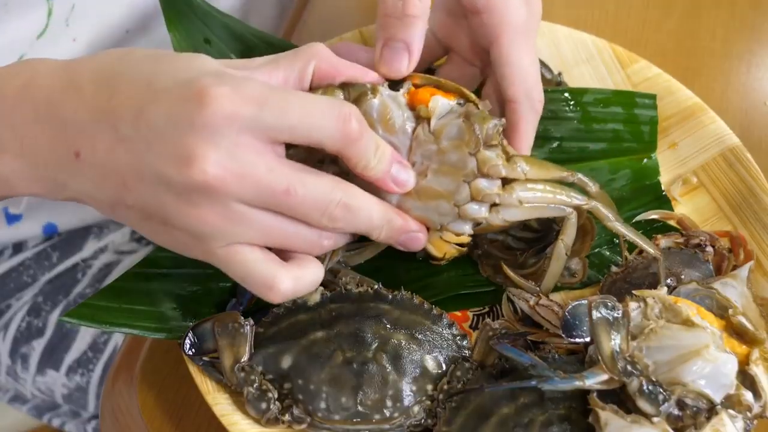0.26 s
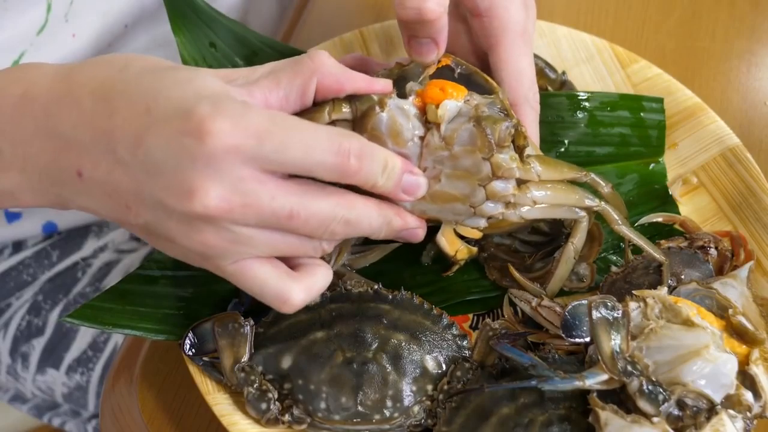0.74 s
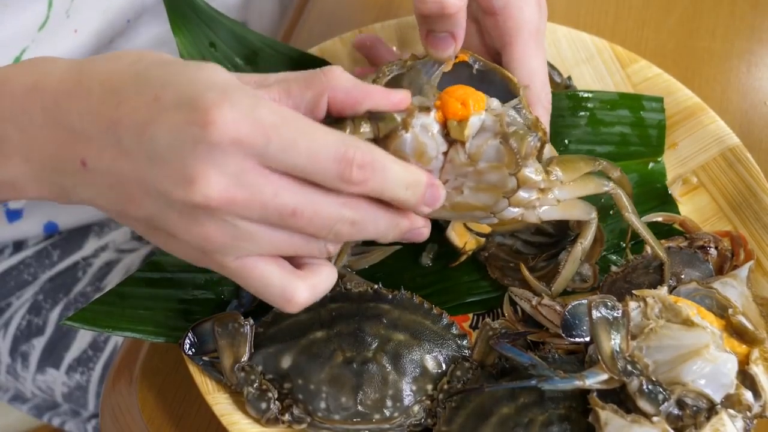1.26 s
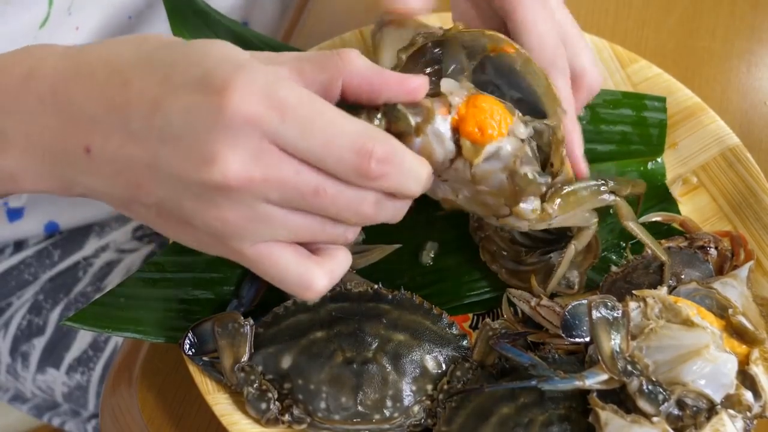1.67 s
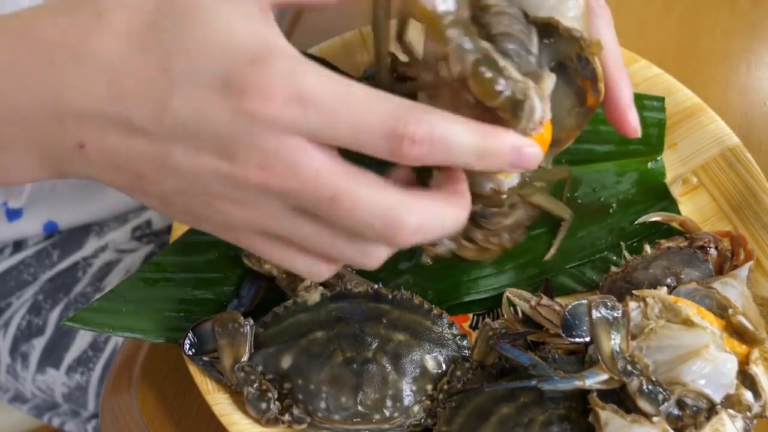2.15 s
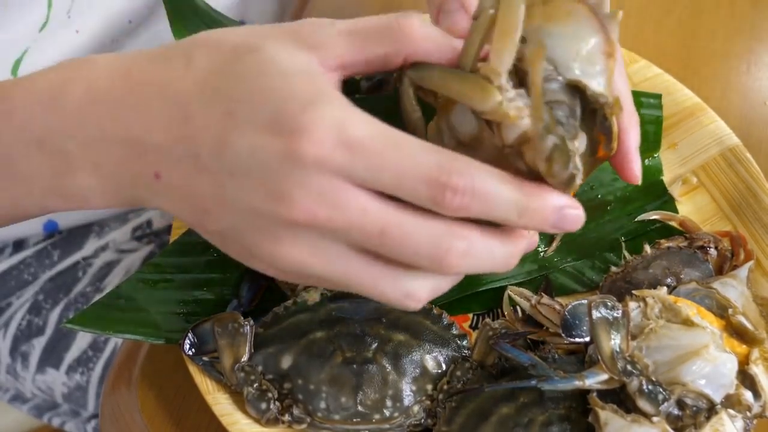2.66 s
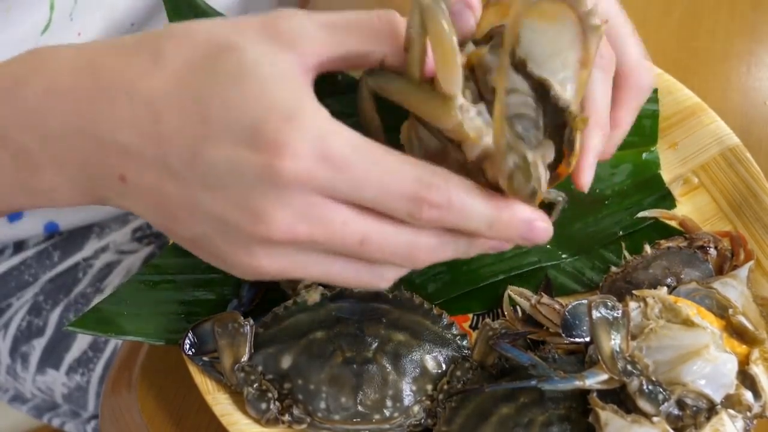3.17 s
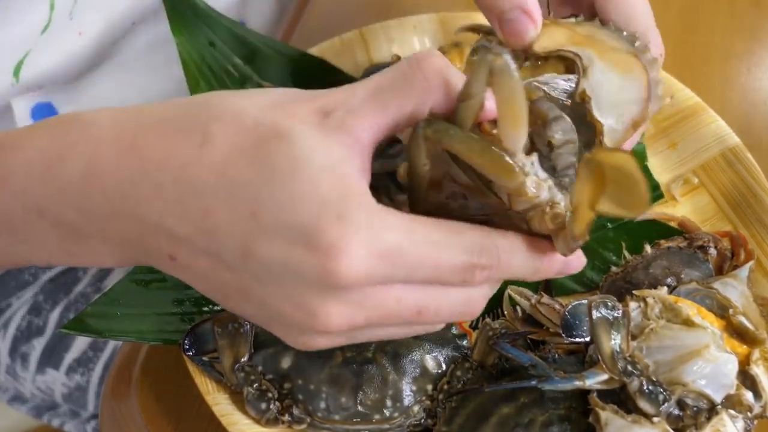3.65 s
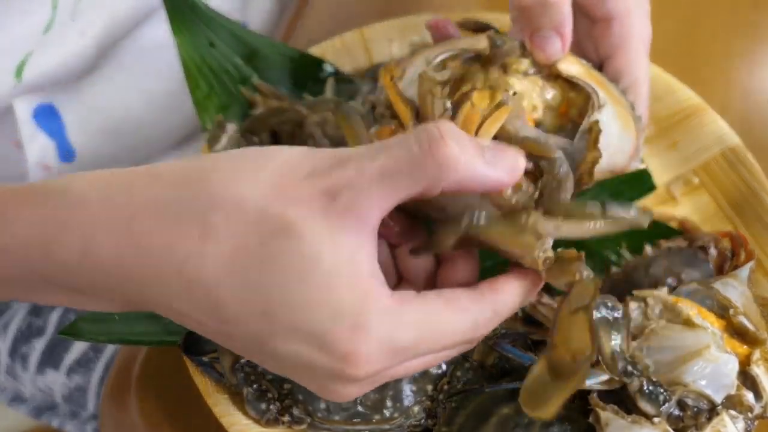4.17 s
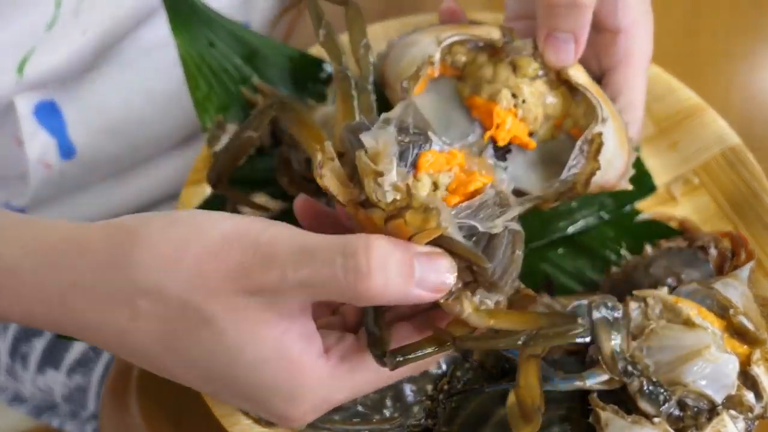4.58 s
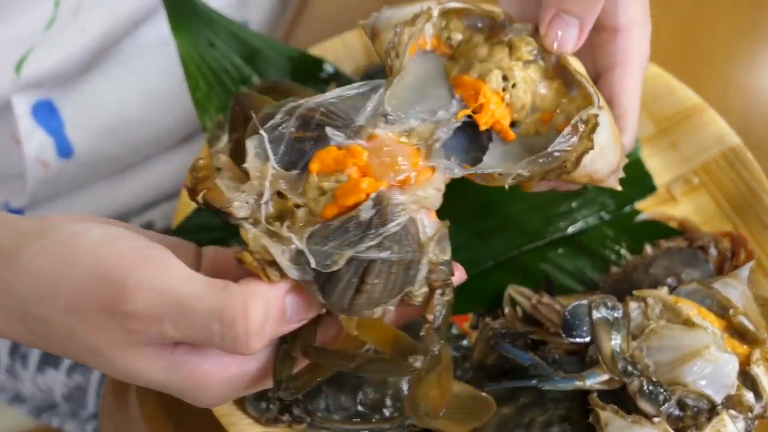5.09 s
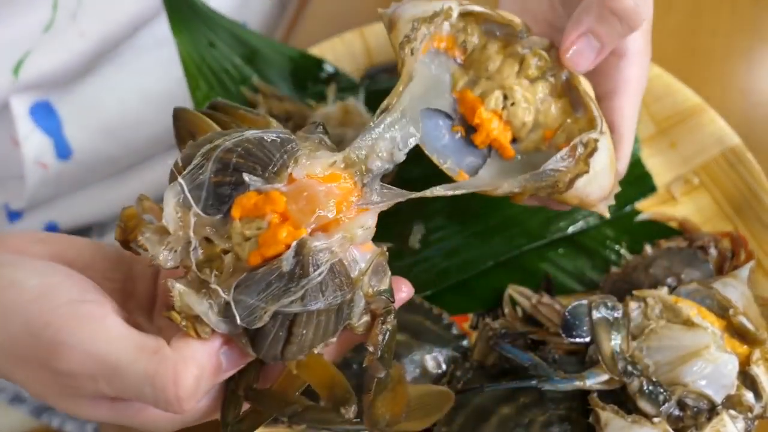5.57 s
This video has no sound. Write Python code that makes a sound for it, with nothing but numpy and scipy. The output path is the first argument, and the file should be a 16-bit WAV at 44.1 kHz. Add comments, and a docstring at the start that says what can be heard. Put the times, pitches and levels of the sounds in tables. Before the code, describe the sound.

A crab shell is pried open by hand, with close, sharp cracks and crunches over gritty, wet tearing.

```python
"""A crab shell cracks as hands pry it open, close to a two-port microphone in a quiet kitchen.
Each fracture is an impulse that excites the shell's modes and rings the loosened piece. Fingers and
flesh add damped bumps, and wet membrane tears in a gritty stream of tiny fractures. An air pocket
squelches once, and the last strands stretch. The grip sends low rumble into both ports; the more
sensitive left port hisses and overloads on the loudest cracks."""
import sys
import numpy as np
from scipy import signal
from scipy.fft import rfft, irfft
from scipy.io import wavfile
from scipy.ndimage import uniform_filter1d

SR = 44100
rng = np.random.default_rng(int(sys.argv[2]) if len(sys.argv) > 2 else 0)


def to_wav(sig):
    """Store sig (one row per channel, or 1-D mono) as 16-bit WAV at the path in sys.argv[1].

    Samples outside -1..1 are clipped; the rate is SR.
    """
    pcm = np.clip(np.atleast_2d(sig), -1, 1) * 32767
    pcm = np.round(pcm).astype(np.int16)
    wavfile.write(sys.argv[1], SR, pcm.T)  # frames by channels


N = 257103

# The distinct breaks. Each row: peak time in seconds, ring level in dB, ring frequency of the loose
# piece in Hz, snap level in dB, snap centre in Hz, fall time in ms, left-right balance in dB.
FRACTURES = [(0.2259, -13, 566, -14, 4200, 2.1, 6), (.2619, -22, 2000, -26, 5200, 2.3, 6),
             (.3031, -14, 1354, -27.5, 6070, 3.3, 6.5), (0.4237, -43, 2430, -32, 5030, .8, 8),
             (0.4713, -16, 2370, -38, 4700, 1.25, 14), (0.5077, -25, 2880, -27, 5100, 0.43, 8),
             (0.541, -28, 2830, -27, 4900, 1.36, 10), (0.5592, -24.5, 2920, -31, 6200, 1.9, 9),
             (.5717, -25, 2910, -22, 5500, 1.5, 11), (.5848, -34, 1430, -25, 5600, 1.3, 2),
             (.617, -4, 3070, -14, 4180, 0.92, 10.5), (.6338, -10.5, 2440, -16, 5870, 2.7, 6),
             (.692, -0.5, 1387, -21.5, 4540, 2.3, 4), (0.6976, -14, 1440, -16, 6700, 0.89, 13),
             (0.7543, -17, 1465, -24, 6000, 2.2, 6), (0.7752, -29, 2710, -9, 6160, 0.56, 9),
             (0.7851, -13.5, 1530, -43, 5890, 3.6, 10), (.798, -15.5, 2367, -47, 5300, 3.7, 14),
             (.8368, -4, 1480, -9, 7200, 2.3, 9), (0.8982, -55, 2547, -26, 6220, 0.84, 13),
             (.97, -47, 2280, -25.5, 6800, 0.73, 8), (0.979, -22.5, 1406, -22.5, 7100, 7.3, 9),
             (1.0217, -22.5, 2600, -25, 5000, 2.1, 6), (1.033, -36, 1615, -34, 5100, .7, 11),
             (1.0458, -49, 2780, -21.5, 5140, 2.3, 9), (1.0882, -25, 2940, -8.5, 6500, 2.2, 13),
             (1.0931, -40, 3050, -11, 7800, 2.2, 9), (1.1021, -34, 2410, -8, 8550, 1.4, 11),
             (1.124, -14, 1510, -11.5, 6950, 5.3, 11), (1.1608, -24, 1780, -15.5, 7000, 2.4, 13),
             (1.1843, -1, 770, -2.5, 6500, 1.4, 13), (1.1896, -6.5, 1427, -4.5, 5980, 2.9, 13),
             (1.1966, -4.5, 1576, -13, 5730, 2.3, 6), (1.2053, -15, 2506, -19, 4800, 3.1, 14),
             (1.211, -16, 3005, -17, 6000, 1.5, 11), (1.2244, -9, 2000, -10, 6500, 2, 6),
             (1.2261, -3, 2240, -2.5, 6400, 4.4, 1.5), (1.2378, -8, 1430, -30, 5660, 1.6, 5),
             (1.2445, -37, 2390, -18.5, 8600, 1, 12), (1.2527, -5, 1650, -30, 6600, 1.6, 6),
             (1.2705, -54, 1430, -25, 6104, 0.54, 2), (1.361, -52, 2400, -37, 6970, .8, 6),
             (1.5314, -24.5, 1595, -35, 4170, .62, 3), (1.571, -26, 2320, -22.5, 5660, 2.17, 3),
             (1.5834, -7.5, 1420, -20.5, 3680, 2, 3.5), (1.6477, -19, 2140, -53, 4500, 0.49, 8),
             (1.6991, -19, 1516, -35.5, 4320, 1.9, 6), (1.7902, -19.5, 1470, -47, 4890, 1.17, 4),
             (1.7992, -19.5, 1580, -34, 5100, 1, 6), (1.863, -26, 1433, -18, 5570, 4.7, 16),
             (1.877, -12, 1770, -14.5, 5100, 10, 8), (1.892, -16, 2285, -18, 5680, 2.7, 11),
             (1.9921, -24, 1580, -35, 6800, 2.6, 9), (2.0018, -26, 1645, -27.5, 4830, 6.2, 8),
             (2.0641, -7, 1680, -15, 4960, 1.25, 12), (2.1014, -18.5, 1550, -36, 5250, 6.3, 12),
             (2.1732, -16, 1700, -36, 4950, 1.3, 14), (2.2049, -17.5, 1370, -17.5, 6200, 1.4, 11),
             (2.2163, -31, 1590, -22, 6800, 1.6, 17), (2.241, -14, 3260, -17, 4320, 0.98, 8),
             (2.3243, -27, 2997, -22.5, 6320, 5.2, 4), (2.509, -37, 1485, -34, 10100, 0.62, 9),
             (2.5264, -24, 1330, -38, 4510, 1.06, 11), (2.574, -16.5, 910, -17, 4660, 2.8, 9.5),
             (2.677, -57, 1510, -33, 10500, 0.54, 21), (2.9572, -21, 1210, -17.5, 11500, 3.2, 15),
             (3.0206, -6, 1243, -14, 3950, 2.2, 15), (3.0532, -28, 1195, -26.5, 5080, 3.5, 12),
             (3.0884, 1, 1397, -5.5, 5030, 3.4, 14), (3.0913, -2.5, 694, -3.5, 5000, 2.6, 11.5),
             (3.118, -14, 1270, -19, 4900, 2.7, 3), (3.2312, -27.5, 1990, -21, 5100, 4.5, 5),
             (3.3233, -28, 995, -40, 5200, 0.71, 6), (3.3365, -23, 1475, -41, 4420, 2.27, 4),
             (3.5492, -16, 1345, -36, 4930, 2.5, -1), (3.5537, -21, 1370, -40, 5620, 1.8, 5),
             (3.5728, -19.5, 1194, -42, 6000, 4.3, 1), (3.5912, -13, 1160, -24, 4900, 3.7, 3),
             (3.6018, -19.5, 1240, -37, 5700, 5, 21), (3.6452, -18, 591, -14.5, 6100, 3.2, 8),
             (3.6625, -17, 691, -14, 5340, 3.5, 6), (3.6852, -19.5, 1090, -29, 5400, 3.8, 8),
             (3.768, -57, 1426, -35, 6490, 0.49, 7), (3.9326, -15.5, 553, -12, 4500, 0.83, 17),
             (3.949, -17.5, 591, -41, 4340, 3.1, 4), (4.0163, -18.5, 562.4, -23, 5350, 2.06, 15),
             (4.1722, -25, 1394, -21.5, 6740, 0.58, 9), (4.2696, -40, 1560, -20.5, 8540, 1.5, 14),
             (4.2808, -30, 1620, -28, 5450, 2.8, 3), (4.3091, -17, 966, -22.5, 4700, 5.8, 10),
             (4.325, -18.5, 1000, -43, 5100, 3.6, 7), (4.337, -14, 980, -44, 4500, 0.93, 8),
             (4.344, -12, 960, -11.5, 10500, 0.84, 16), (4.3498, -9, 1070, -42, 4600, 2.6, 10),
             (4.3553, -13.5, 538, -7.5, 9600, 2.3, 13), (4.3656, -5.5, 3030, -15, 9000, 0.36, 15),
             (4.374, -28, 1100, -25, 9500, 1.3, 12), (4.3902, -6, 1114, -47, 5100, 2.2, 8),
             (4.4023, -15, 1140, -20, 3850, 4.6, 8), (4.4418, -15, 1085, -38, 4800, 1.07, 14),
             (4.5055, -14.5, 2870, -8.5, 4330, 1.9, 10), (4.5893, -11.5, 1165, -5.5, 6150, 2.66, 12.5),
             (4.6342, -26, 1240, -41, 6200, 1.54, 13), (4.66, -17.5, 1877, -15, 7340, 2.9, 8),
             (4.9442, -19, 1426, -26, 5460, 2.9, 14), (5.0319, -10.5, 1650, -11.5, 6250, 3.4, 15),
             (5.0432, -12, 1460, -14.5, 3900, 2, 14), (5.077, -40, 2330, -30, 4950, .8, 11),
             (5.089, -34, 1000, -40, 5030, .8, 14), (5.1876, -62, 580, -28, 8105, 0.31, 22),
             (5.3199, -16.5, 1560, -14.5, 4890, 2.8, 18)]
# Modes of the shell. Each row: frequency in Hz, nominal bandwidth in Hz, relative gain in dB.
SHELL_MODES = [(760, 133, -19), (1368, 370, 22), (2365, 190, 6), (3535, 1800, 3.5), (5420, 2160, -0.5),
               (7070, 2100, -2), (9690, 1770, -9), (13100, 3300, -32)]
# Fingers and flesh strike the shell. Each row: peak time in seconds, level in dB, pitch in Hz,
# length in ms.
BUMPS = [(.117, -19, 224, 2), (.201, -21, 450, 9.4), (.219, -19.5, 300, 6.9), (.228, -8.5, 370, 4.3),
         (0.632, -22, 128, 6.9), (.695, -18.5, 525, 11.2), (.784, -25, 79.7, 16), (1.23, -23, 150, 6.8),
         (1.514, -24.5, 452, 5.3), (1.6, -25, 189, 12.8), (1.651, -28.5, 408, 6), (2.227, -15, 508, 3.4),
         (2.287, -23.5, 158, 15.3), (2.299, -23, 102, 13), (2.316, -22, 364, 5.4), (2.575, -30, 79, 13),
         (2.958, -27.5, 161, 4), (3.02, -13.5, 440, 2.6), (3.089, -16.5, 120, 12), (3.163, -16.5, 189, 3.9),
         (3.255, -28, 239, 4.6), (3.341, -34, 182.3, 6.7), (3.49, -30, 448, 6.2), (3.572, -23.5, 448, 8.9),
         (3.644, -21, 497, 16), (3.673, -13, 232, 6), (3.688, -18, 184, 9.4), (3.724, -19.5, 198, 4.9),
         (3.934, -26, 142, 19.4), (3.948, -23, 316, 15.5), (4.019, -21.5, 79.5, 6), (4.124, -22, 284, 11.4),
         (4.171, -32, 310, 12.4), (4.342, -19, 236, 7.9), (4.364, -10, 257, 3.9), (4.391, -16.5, 530, 4.9),
         (4.506, -20.5, 448, 2.6), (4.79, -32, 199, 7.5), (5.322, -23.5, 453, 4.3)]
# Pulls that rip the membrane. Each row: swell start, swell top, fade start and fade end in seconds,
# then tearing, fizz and flesh push levels in dB. Swell and fade may overlap; a fade end at or before
# the fade start cuts the rip off abruptly.
MEMBRANE_PULLS = [(.05, 0.215, 0.23, 0.26, -33.5, -40.5, -32.5),
                  (0.269, 0.312, 0.31, 0.34, -36.5, -49, -37), (0.406, 0.468, 0.54, 0.89, -43, -43, -57),
                  (0.576, 0.675, 0.68, 0.79, -30, -29.5, -31), (0.718, 0.766, 0.77, 0.94, -30, -29, -37),
                  (0.892, 0.998, 1.03, 1.12, -46.5, -42.5, -44),
                  (1.072, 1.097, 1.1, 1.233, -37, -33.5, -43),
                  (1.17, 1.201, 1.267, 1.312, -30.5, -34.5, -46), (1.452, 1.501, 1.48, 1.72, -44, -56, -40),
                  (1.545, 1.592, 1.636, 1.68, -42, -68, -41.5),
                  (1.645, 1.868, 1.905, 1.93, -34, -31.5, -42.5),
                  (1.88, 1.913, 1.99, 1.99, -46, -44.5, -44.5),
                  (1.955, 2.046, 2.07, 2.37, -44.5, -43.5, -47),
                  (2.138, 2.221, 2.312, 2.374, -33, -30.5, -33),
                  (2.324, 2.387, 2.39, 2.445, -28.5, -31.5, -42), (2.48, 2.517, 2.58, 2.69, -46, -65, -45),
                  (2.681, 2.732, 2.76, 2.77, -40, -42, -42), (2.785, 2.913, 2.934, 3.07, -43, -42, -43.5),
                  (3.078, 3.099, 3.126, 3.304, -32.5, -36.5, -41.5),
                  (3.278, 3.339, 3.345, 3.39, -31, -34.5, -31.5), (3.393, 3.443, 3.49, 3.4, -45, -48, -50),
                  (3.534, 3.556, 3.67, 3.75, -34, -34.5, -30.5),
                  (3.764, 3.907, 3.91, 4.04, -32, -33.5, -30.5),
                  (3.904, 3.98, 4.07, 4.305, -36.5, -39.5, -39.5),
                  (4.289, 4.347, 4.287, 4.43, -30, -33, -26.5), (4.372, 4.409, 4.466, 4.5, -39, -47.5, -52),
                  (4.481, 4.588, 4.6, 4.8, -43, -59, -56), (4.724, 4.787, 4.81, 4.62, -49.5, -54, -47.5),
                  (5.022, 5.036, 5, 5.62, -45, -64, -55)]
# Spectra of the membrane's fizz and the flesh's push. Each row: frequency in Hz, relative level in dB.
FIZZ_SPECTRUM = [(2000, 0.5), (3500, -7), (5500, -1), (7500, -2.5), (9000, -8), (12000, -9), (15500, -22)]
PUSH_SPECTRUM = [(60, -13.5), (110, 5.5), (180, 2.5), (300, -2), (500, -2.5), (900, -13)]
# Air squeezed from a wet pocket. Each row: time in seconds, level in dB, resonance in Hz.
AIR_POCKET = [(2.35, -55, 1246), (2.366, -25, 1380), (2.381, -13, 1410), (2.392, -17.5, 1555),
              (2.408, -31.5, 1530), (2.428, -44, 1320)]
# The last strands stretching. Each row: time in seconds, level in dB, centre frequency in Hz.
STRANDS = [(5.04, -75, 3500), (5.1, -69, 3400), (5.28, -59, 3170), (5.4, -60, 2760), (5.5, -57.5, 2420),
           (5.7, -69, 2200), (5.83, -76, 2030)]
# Where the crab is held. Each row: time in seconds, left-right balance in dB.
HAND_BALANCE = [(0.0, 4), (1.15, 13), (1.23, 5), (1.72, 6.5), (1.96, 6.5), (2.06, 12), (2.26, 7),
                (2.58, 12), (2.63, 9), (3.05, 15.5), (3.07, 4.5), (3.3, 1.5), (4.61, 9.5), (4.64, 8),
                (5.33, 17), (5.36, 16), (5.75, 13.5), (5.83, 7)]
# Rumble of the grip. Each row: time in seconds, base level in dB, left-right balance in dB.
GRIP_LEVELS = [(0.0, -36.5, -3.0), (0.29, -33, -6.0), (0.41, -38.5, -2), (1.23, -33, -4.5),
               (1.36, -42.5, -16), (1.79, -33, -1), (1.87, -37.5, -16), (2.0, -39, -9), (2.97, -44.5, -3.5),
               (3.1, -32.5, -4), (3.23, -45.5, -12), (3.75, -43, -7), (4.06, -39, -6), (4.27, -44.5, -2),
               (4.35, -49, 16.0), (4.42, -51, -16), (5.81, -58.5, 2), (5.83, -66, -1.5)]
# Spectra of the rumble and of kitchen air with hiss. Each row: frequency in Hz, relative level in dB.
RUMBLE_SPECTRUM = [(8, -22.5), (16, 13.5), (30, -2.5), (50, -1), (80, -6.5), (130, -16), (250, -24.5)]
BACKGROUND_SPECTRUM = [(12, -25), (20, 2), (113, -17), (241, -3), (301, -26), (347, -16.5), (377, -13.5),
                       (1220, -23), (2260, -21), (2460, -29), (5230, -25.5), (14300, -25), (16000, -33)]
# Left noise floor, which sinks and creeps back. Each row: time in seconds, level in dB.
LEFT_HISS = [(0, -44.5), (.4, -52.5), (1.3, -57), (2.5, -51), (3.0, -47.5), (3.4, -49), (4.2, -50),
             (5.83, -47)]
# Likeness of the two ports. Each row: frequency in Hz, coherence from 0 to 1.
PORT_COHERENCE = [(100, 0.77), (300, 0.71), (700, 0.66), (1500, 0.41), (3000, 0.42), (7000, 0.31),
                  (15000, 0.05)]


def cracks():
    """Brittle fracture: each break releases stored elastic energy as a short burst of noise."""
    lead = 300
    ms = (np.arange(1500) - lead) / SR * 1000
    rows = small_breaks() + FRACTURES
    noises = rng.standard_normal((len(rows), len(ms)))
    return placed([crack(row, noise, ms) for row, noise in zip(rows, noises)], lead)


def crack(row, noise, ms):
    """Impulse response: a burst excites the shell modes near the snap centre; the loose piece rings."""
    peak_s, ring_db, hz, snap_db, snap_hz, fall_ms, pan_db = row
    # snaps start at once; a wet pop (ring above snap) swells, most slowly below 1000 Hz
    snap_rise_ms = .26
    ring_rise_ms = snap_rise_ms + .06 * max(ring_db - snap_db, 0) * min(1000 / hz, 1) ** 2.3
    decay_db = -12 * ms / max(fall_ms, .4)
    snap_shape = gain_of(np.where(ms < 0, 9 * ms / snap_rise_ms, decay_db))
    ring_shape = gain_of(np.where(ms < 0, 9 * ms / ring_rise_ms, decay_db))
    burst = noise * (snap_shape ** 1.3 + .02 * np.exp(-ms / 4) * (ms > 0))
    snap = sum(gain_of(db - 7 * np.log2(mode_hz / snap_hz) ** 2) * steep(burst, mode_hz, 1.32 * width)
               for mode_hz, width, db in SHELL_MODES)
    splinter_db = -5.5 + 46 * np.log2(min(snap_hz / 10000, 1))  # only the finest breaks splinter
    snap += gain_of(splinter_db) * steep(burst, hz=12900, width=5400)
    ring_shape = uniform_filter1d(ring_shape, size=round(SR / hz))  # a ring needs a cycle to build
    roughness = .9 * np.clip(1 + (snap_db - ring_db) / 35, .4, 1)  # wet pops ring more cleanly
    ring_noise = evened(steep(noise[::-1], hz, .9 * hz))
    ring = ring_shape * (np.sin(2 * np.pi * hz * ms / 1000) + roughness * ring_noise)
    # hard breaks also flex the whole shell in its lowest mode
    flex_shape = (ms > 0) * ms / 1.74 * np.exp(1 - abs(ms) / .83)
    flex = flex_shape * np.sin(2 * np.pi * SHELL_MODES[0][0] * ms / 1000)
    sound = gain_of(ring_db) * ring / abs(ring).max() + gain_of(snap_db + 4) * snap / abs(snap).max()
    return peak_s, sound + gain_of(2.56 * min(ring_db, 0) - 6) * flex, pan_db


def small_breaks(count=55, spread_db=6):
    """Random failure under load: breaks are likelier in a strong pull and ring near a low shell mode."""
    tear_db, fizz_db, _ = pull_levels()
    likelihood = np.cumsum(gain_of(.33 * tear_db))
    when, mode, detune, ring_drop, snap_drop, brightness, length = rng.random((count, 7)).T
    at = np.clip(np.searchsorted(likelihood, when * likelihood[-1]), 400, N - 1)
    ring_hz = np.transpose(SHELL_MODES)[0][(mode * 3).astype(int)] * (.85 + .3 * detune)
    ring_db = tear_db[at] + 12.5 - spread_db * ring_drop
    snap_db = fizz_db[at] + 10 - spread_db * snap_drop
    snap_hz = 5600 * (.8 + .4 * brightness)
    fall_ms = 1.8 * (.3 + 1.28 * length)
    return list(zip(at / SR, ring_db, ring_hz, snap_db, snap_hz, fall_ms, along(HAND_BALANCE)[0][at]))


def finger_bumps(lead=800):
    """Heavily damped oscillation: a soft impact on the shell dies away within a few cycles."""
    ms = (np.arange(2400) - lead) / SR * 1000
    bumps, pan_db = [], along(HAND_BALANCE)[0]
    for (peak_s, db, hz, length_ms), phase in zip(BUMPS, rng.random(len(BUMPS))):
        shape = np.exp(-np.where(ms < 0, (ms / (.3 * length_ms)) ** 2, ms / (.38 * length_ms)))
        tone = np.cos(2 * np.pi * (hz * ms / 1000 + phase))
        bumps.append((peak_s, gain_of(db) * shape * tone, pan_db[round(peak_s * SR)]))
    return placed(bumps, lead)


def tearing():
    """Forced vibration: ripping membrane drives the shell modes, with fizz above and flesh push below."""
    tear_db, fizz_db, push_db = pull_levels()
    pan_db = along(HAND_BALANCE)[0]
    rip = grit(per_s=700, spread_db=3.7, smooth=.55)
    body = np.zeros(N)
    # the fingers damp and bend the shell, so each low mode is broad and drifts in strength and pitch
    for (hz, _, _), db in zip(SHELL_MODES[:4], [-8.5, 4, 1, .5]):
        strength = gain_of(db + 2.5 * wander(size=500))
        drifting_hz = hz * (1 + .04 * wander(size=2500))
        body += strength * evened(steep(rip, drifting_hz, .6 * hz))
    fizz = colour(.53 * rip + grit(per_s=600, spread_db=5.5, smooth=.63), FIZZ_SPECTRUM)
    push = colour(grit(per_s=400, spread_db=4, smooth=.6), PUSH_SPECTRUM)
    bright = gain_of(tear_db) * evened(body) + gain_of(fizz_db) * evened(fizz)
    return ports(bright, pan_db) + ports(gain_of(push_db) * evened(push), pan_db)


def pull_levels(rest_tear_db=-60.5, rest_fizz_db=-61, rest_push_db=-57, fade_db=-23):
    """Incoherent sources add in power: the pulls sum to tearing, fizz and push level curves in dB."""
    t = np.arange(0, N / SR, .002)
    power = gain_of(np.outer([rest_tear_db, rest_fizz_db, rest_push_db], np.ones(len(t)))) ** 2
    for swell_start, swell_top, fade_start, fade_end, *levels_db in MEMBRANE_PULLS:
        rise_s, fall_s = max(swell_top - swell_start, .005), max(fade_end - fade_start, .005)
        faded = np.maximum(np.maximum((swell_top - t) / rise_s, (t - fade_start) / fall_s), 0)
        power += gain_of(np.add.outer(levels_db, fade_db * faded)) ** 2
    return along(np.c_[t, 10 * np.log10(power).T])


def grit(per_s, spread_db, smooth):
    """Shot noise: tiny fractures, a few of them large, blend with smooth noise and swell in clumps."""
    clumps = gain_of(3.3 * evened(uniform_filter1d(rng.standard_normal(N), 350)))
    sizes = gain_of(spread_db * np.minimum(rng.exponential(1, N), 5))
    impulses = sizes * (rng.random(N) < per_s / SR)
    grains = signal.lfilter([1], [1, -.9], impulses) * rng.standard_normal(N)
    return clumps * (smooth * rng.standard_normal(N) + (1 - smooth) * evened(grains))


def squelch(pops_per_s=2500):
    """Cavity resonance: uneven pops of air ring a wet pocket's moving pitch and a steady overtone."""
    level_db, hz = along(AIR_POCKET)
    t = np.arange(N) / SR
    pops = (rng.random(N) < pops_per_s / SR) * rng.standard_normal(N)
    pocket = evened(steep(pops, hz, width=520))
    overtone = gain_of(-13) * evened(steep(pops, hz=3600, width=900))
    sounding = (t > AIR_POCKET[0][0]) * (t < AIR_POCKET[-1][0])
    return ports(gain_of(level_db) * (pocket + overtone) * sounding, pan_db=12.3)


def stretching_strands():
    """Band-limited shot noise: a faint wet rustle whose centre sinks as the strands thin out."""
    level_db, hz = along(STRANDS)
    rustle = evened(steep(grit(per_s=1500, spread_db=2.56, smooth=.66), hz, width=900))
    sounding = np.arange(N) / SR > STRANDS[0][0]
    return ports(gain_of(level_db) * rustle * sounding, pan_db=14.6)


def grip_rumble(push_share=.091):
    """Structure-borne sound: the grip sends lumpy rumble, nearly uncorrelated, into the two ports."""
    level_db, pan_db = along(GRIP_LEVELS)
    push_db = pull_levels()[2]
    level_db += push_share * (push_db - uniform_filter1d(push_db, size=SR // 2))
    lumps = gain_of(2.5 * wander(size=1200))
    rumble = colour(lumps * rng.standard_normal((2, N)), RUMBLE_SPECTRUM)
    return gain_of(level_db + np.outer([.5, -.5], pan_db)) * evened(rumble + .033 * rumble[::-1])


def reflections(x, rt60_s=.064):
    """Reverberation: sparse echoes decay exponentially, in a separate pattern at each port."""
    t = np.arange(6000) / SR
    taps = rng.choice([-1., 1.], (2, len(t))) * (rng.random((2, len(t))) < .05)
    taps *= gain_of(-60 * t / rt60_s) * (t > .002)
    return signal.oaconvolve(x, taps / np.linalg.norm(taps[0]), axes=1)[:, :N]


def background(right_db=-66):
    """Noise floor: kitchen air and preamplifier hiss, much stronger in the left port."""
    air = colour(rng.standard_normal((2, N)), BACKGROUND_SPECTRUM)
    air = evened(air + .03 * air[::-1])
    return air * gain_of([along(LEFT_HISS)[0], np.full(N, right_db)])


def ports(x, pan_db, path_change_hz=3.1):
    """Partial coherence: the right port hears a partly scattered copy, less alike in the treble."""
    coherence = np.clip(read(PORT_COHERENCE, np.fft.rfftfreq(N, 1 / SR)), 0, 1)
    paths = rng.standard_normal((2, 300)) * np.exp(-np.arange(300) / 30)
    paths /= np.linalg.norm(paths, axis=1, keepdims=True)
    first, second = signal.oaconvolve(x[None], paths, axes=1)[:, :N]
    turn = 2 * np.pi * (rng.random() + path_change_hz * np.arange(N) / SR)  # the hands move
    scattered = first * np.cos(turn) + second * np.sin(turn)
    right = irfft(coherence * rfft(x) + np.sqrt(1 - coherence ** 2) * rfft(scattered), N)
    balance = gain_of(np.clip(pan_db, -12, 24))
    return np.array([balance * x, right]) * 2 / (1 + balance)


def placed(events, lead):
    """Superposition of (peak seconds, sound, balance dB) events, each peaking lead samples in."""
    mix, pan = np.zeros(N + SR), np.zeros(N + SR)
    for peak_s, sound, pan_db in events:
        at = round(peak_s * SR) - lead
        mix[at:at + len(sound)] += sound
        pan[at + lead // 2:at + len(sound)] = pan_db
    return ports(mix[:N], pan[:N])


def steep(x, hz, width):
    """Two resonators in cascade, each width Hz wide: shift hz down to zero, smooth, shift back."""
    carrier = np.exp(2j * np.pi * np.cumsum(hz * np.ones(x.shape[-1])) / SR)
    pole = np.exp(-np.pi * width / SR)
    for _ in range(2):
        x = 2 * (carrier * signal.lfilter([1 - pole], [1, -pole], x / carrier)).real
    return x


def colour(x, spectrum):
    """Spectral shaping by (Hz, dB) points, falling away beyond their ends."""
    hz = np.fft.rfftfreq(x.shape[-1], 1 / SR)
    response_db = read([(0, -83.5)] + list(spectrum) + [(SR / 2, -90)], hz)
    return irfft(rfft(x) * gain_of(response_db), x.shape[-1])


def read(spectrum, hz):
    """Interpolation on a logarithmic frequency axis."""
    point_hz, values = np.transpose(spectrum)
    return np.interp(np.log(hz + 1), np.log(point_hz + 1), values)


def along(rows):
    """Linear interpolation of a time table's columns at every sample."""
    times, *columns = np.transpose(rows)
    return [np.interp(np.arange(N) / SR, times, column) for column in columns]


def wander(size):
    """Random drift of rms 1: noise averaged twice over size samples."""
    return evened(uniform_filter1d(uniform_filter1d(rng.standard_normal(N), size), size))


def evened(x):
    """Normalisation to rms 1."""
    return x / np.sqrt(np.mean(x ** 2) + 1e-20)


def gain_of(db):
    """Amplitude ratio of a level in decibels."""
    return 10 ** (np.asarray(db) / 20)


def scene():
    """Superposition of the crab's direct sound, its faint reflections, the grip and the noise floor."""
    crab = cracks() + finger_bumps() + tearing() + squelch() + stretching_strands()
    return crab + gain_of(-27) * reflections(crab) + grip_rumble() + background()


def record(dry):
    """Saturation: peaks flatten near full scale, then a low-pass filter limits the bandwidth."""
    overloaded = np.clip(dry, -.9, .9)
    lowpass = signal.firwin(301, cutoff=16300, window=("kaiser", 9), fs=SR)
    return signal.oaconvolve(overloaded, lowpass[None], "same")


dry = scene()
out = record(dry)
to_wav(out)
```